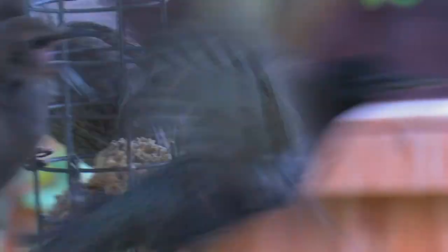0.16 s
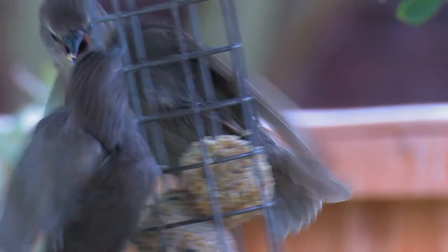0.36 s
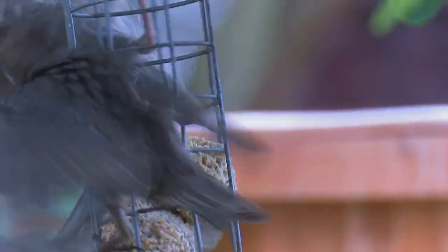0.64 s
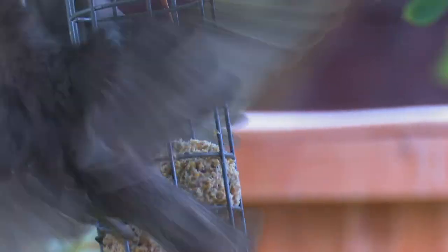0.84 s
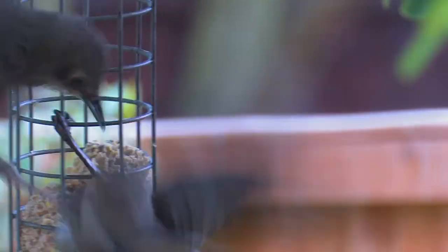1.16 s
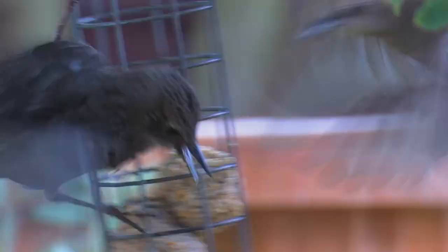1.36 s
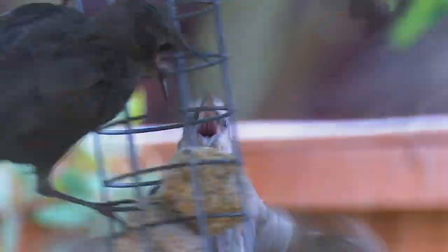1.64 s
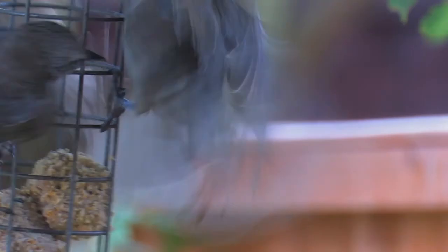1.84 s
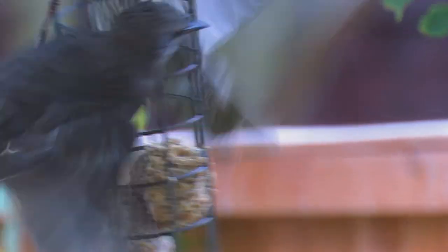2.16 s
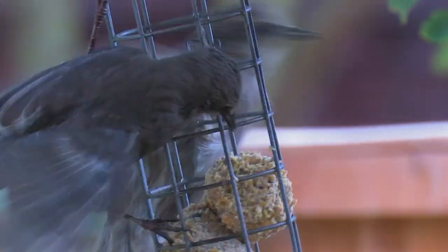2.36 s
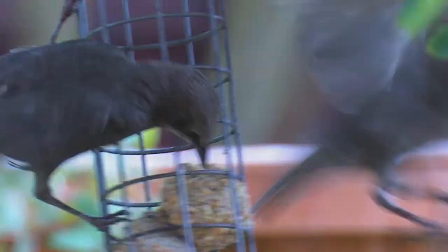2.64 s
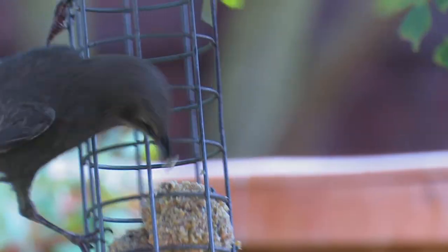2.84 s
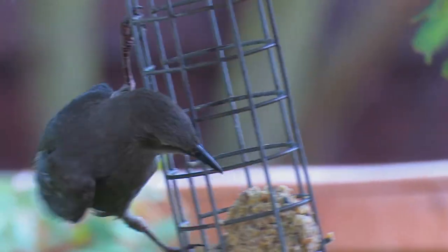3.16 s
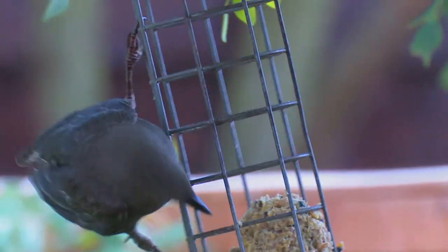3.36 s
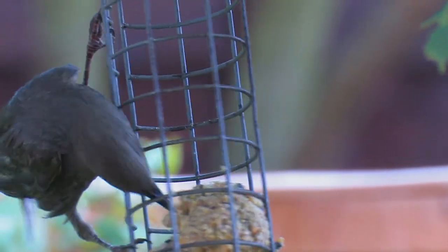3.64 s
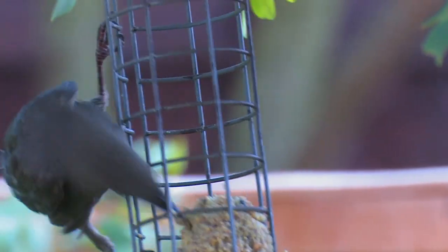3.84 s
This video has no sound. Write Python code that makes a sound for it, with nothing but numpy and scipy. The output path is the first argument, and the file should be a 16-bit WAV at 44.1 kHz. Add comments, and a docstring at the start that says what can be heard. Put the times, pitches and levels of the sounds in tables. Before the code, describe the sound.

Young starlings squabble close to the microphone with rasping squawks, sharp squeals and buzzing trills over fluttering wings, then quieten after about 2.7 seconds, leaving beak taps and distant pigeon coos in an open garden.

```python
"""Young starlings squabble at a wire garden feeder: harsh squawks (harmonics and pulsing noise through a throat filter,
with a swerving screech), gliding squeals and buzzing trills (shaking whistled tones) overlap.
Beaks tap the cage (decaying noise) and wings flap (noise swelling at each beat). Further off a wood pigeon coos
five times in two-tone coos, and other birds whistle and rasp. Fences and walls answer faintly with reflections and
a diffuse echo, over a low outdoor rumble of noise, a faint hum and a low drone."""
import sys
import numpy as np
from scipy import signal
from scipy.fft import rfft, irfft, next_fast_len
from scipy.io import wavfile
from scipy.ndimage import map_coordinates

SR = 44100
rng = np.random.default_rng(int(sys.argv[2]) if len(sys.argv) > 2 else 0)


def materialize(psi):
    """Save the field psi as 16-bit PCM at rate SR to the path in sys.argv[1].

    A 1-D psi becomes a single channel; in a 2-D psi each row is a channel.
    """
    bounded = np.clip(np.atleast_2d(psi).T, -1, 1)
    quanta = np.round(bounded * 32767).astype(np.int16)
    wavfile.write(sys.argv[1], SR, quanta)


N = 176400
T = np.arange(N) / SR

# throat resonances of the near birds: (frequency [Hz], level [dB])
THROAT = [(530, -45), (900, -15), (1380, -25.5), (1630, -12.5), (2420, -8), (2660, -5.5), (4280, -10.5),
          (5180, -5), (5910, -9), (10300, -20), (12100, -28.5), (15500, -27)]
JITTER_PER_S, WANDER_PER_S = 900, 130  # fast and slower unsteadiness, random knots per second
SECOND_DB = -15.5  # second harmonic of squeals and screeches


def amp(db):
    """Decibels to gain."""
    return 10 ** (np.asarray(db) / 20)


def unit(x):
    """Scale to rms 1."""
    return x / np.sqrt(np.mean(x ** 2) + 1e-20)


def along(points, hz):
    """Read a curve of (frequency, value) points on a log frequency axis."""
    f, v = np.transpose(points)
    return np.interp(np.log(hz + 1), np.log(f + 1), v)


def wobble(rate, n):
    """A smooth random curve with rate knots a second."""
    knots = rng.standard_normal(n // 8 + 4)
    return map_coordinates(knots, [np.arange(n) * rate / SR], mode="mirror")


def filtered(x, response):
    """Shape the spectrum of x by a response of frequency."""
    m = next_fast_len(len(x) + SR // 20)
    hz = np.fft.rfftfreq(m, 1 / SR)
    return irfft(rfft(x, m) * response(hz), m)[:len(x)]


def noise(spectrum, n):
    """Coloured noise of rms 1."""
    return unit(filtered(rng.standard_normal(n), lambda f: amp(along(spectrum, f))))


def add(track, s, x):
    """Mix x into the track at s seconds."""
    i = max(0, round(s * SR))
    track[i:i + len(x)] += x[:max(0, N - i)]


def clock(length):
    """Seconds and fraction elapsed within a call of at least 4 ms."""
    t = np.arange(int(max(length, .004) * SR)) / SR
    return t, t / t[-1]


def gate(t, attack, release):
    """Attack, hold, release, with quarter-sine edges."""
    rise = np.sin(np.pi / 2 * np.clip(t / attack, 0, 1))
    return rise * np.sin(np.pi / 2 * np.clip((t[-1] - t) / release, 0, 1))


def arch(u, first, middle, last):
    """A parabola through three pitches."""
    return np.polyval(np.polyfit([0, .5, 1], [first, middle, last], 2), u)


def phase_of(hz):
    """Running phase of a pitch curve."""
    return 2 * np.pi * np.cumsum(hz) / SR


def squawks():
    """Unsteady harmonics of falling pitch and pulsing noise ring in throat and open beak, under a screech."""
    # harsh calls: (time [s], length [s], pitch [Hz], level [dB], beak resonance [Hz])
    squawk_calls = [(0.038, 0.07, 1159, -34, 3530), (0.152, 0.095, 1032, -31.5, 3980),
                    (0.292, 0.05, 953, -29.5, 4500), (0.374, 0.075, 1248, -28, 4480),
                    (0.44, 0.072, 1154, -29, 4090), (0.504, 0.094, 1096, -38.5, 5020),
                    (0.579, 0.067, 1010, -33.5, 4980), (0.716, 0.094, 1410, -38, 8000),
                    (0.805, 0.053, 1055, -34.5, 5930), (0.858, 0.077, 1106, -39, 4620),
                    (0.916, 0.18, 1404, -35.5, 4535), (1.134, 0.016, 1202, -38.5, 4180),
                    (1.327, 0.032, 1059, -39, 4370), (1.435, 0.048, 946, -42, 3570),
                    (1.594, 0.072, 1295, -35, 4590), (1.651, .11, 1311, -33.5, 4970),
                    (1.744, 0.13, 1344, -36.5, 5020), (1.862, 0.079, 1414, -37.5, 4310),
                    (1.977, 0.057, 1054, -35, 4990), (2.049, 0.066, 1402, -38.5, 4740),
                    (2.154, 0.057, 1008, -36, 4870), (2.35, 0.034, 1060, -38, 3220),
                    (2.385, 0.038, 866, -41.5, 4180), (2.46, 0.059, 845, -34.5, 5000),
                    (2.635, 0.094, 1432, -46.5, 5390), (3.845, .1, 857, -44.5, 3500),
                    (3.946, 0.067, 893, -44.5, 2950)]
    pitch_fall, jitter, wander = .2, .033, .045  # fractions of the pitch
    noise_share, flutter_db = .17, 2.5  # share of power; roughness of level
    beak_db, beak_octaves = 5.5, 0.55  # height and width of the beak resonance
    screech_db = -2
    out = np.zeros(N)
    for s, length, pitch_hz, db, beak_hz in squawk_calls:
        t, u = clock(length)
        n = len(t)
        fall = 1 - pitch_fall * u ** 2
        shake = 1 + jitter * wobble(JITTER_PER_S, n) + wander * wobble(WANDER_PER_S, n)
        p = phase_of(pitch_hz * fall * shake)
        start_phases = rng.uniform(0, 2 * np.pi, (14, 1))
        harmonics = unit(np.cos(np.arange(1, 15)[:, None] * p + start_phases).sum(0))
        hiss = unit(rng.standard_normal(n) * (1 + np.cos(p)))  # swells once per pitch cycle
        source = np.sqrt(1 - noise_share) * harmonics + np.sqrt(noise_share) * hiss
        source = source * amp(flutter_db * wobble(310.6, n))

        def tract(f):
            """Throat and open-beak resonances, thinned below about 700 Hz."""
            octaves_off = np.log2((f + 1) / beak_hz)
            beak = beak_db * np.exp(-.5 * (octaves_off / beak_octaves) ** 2)
            return amp(along(THROAT, f) + beak) * (1 - np.exp(-(f / 700) ** 2))

        voice = unit(filtered(source, tract)) + amp(screech_db) * screech(beak_hz * fall, n)
        add(out, s, amp(db) * unit(voice * gate(t, 0.0077, 0.016)))
    return out


def screech(hz, n):
    """The other side of the syrinx: one tone that swerves wildly about its pitch."""
    swing, rate, flutter_db = .17, 250, 3.5  # log pitch ratio, knots per second, level scatter
    p = phase_of(hz * np.exp(swing * wobble(rate, n)))
    tone = np.sin(p) + amp(SECOND_DB) * np.sin(2 * p)
    return unit(tone * amp(flutter_db * wobble(rate, n)))


def squeals():
    """Each squeal is a syrinx tone gliding along an arch of pitch."""
    # (time [s], length [s], start [Hz], middle [Hz], end [Hz], level [dB], roughness [0-1])
    squeal_calls = [(0, 0.043, 4030, 3930, 3510, -39, 0.25), (0.154, 0.061, 2956, 2900, 2980, -40, 0.06),
                    (.228, 0.062, 3187, 3240, 2654, -34, 0.39), (0.486, 0.08, 3100, 3400, 2786, -35, 0.15),
                    (0.469, 0.1, 6370, 6780, 5770, -36.5, 0.21), (0.62, 0.07, 7620, 6640, 6300, -36.5, 0.1),
                    (0.726, 0.054, 5600, 5740, 6050, -30.5, 0.27), (0.865, .032, 5000, 4600, 4170, -36, .5),
                    (1.058, 0.088, 5000, 5030, 4910, -40.5, 0.14),
                    (1.238, 0.052, 6100, 6530, 6460, -42.5, 0.14),
                    (1.288, 0.026, 6360, 6250, 6180, -38, 0.01), (1.336, .085, 3250, 3200, 3080, -45, .15),
                    (1.424, 0.012, 3380, 3180, 2720, -38, 0.44),
                    (1.561, 0.038, 4410, 3974, 3380, -32, 0.32), (1.653, 0.06, 4690, 5600, 4510, -30, 0.32),
                    (1.746, .034, 4700, 4725, 5470, -27.5, 0.39),
                    (1.77, 0.042, 6010, 6760, 6180, -32, 0.22),
                    (1.812, 0.038, 5310, 4814, 3750, -29.5, 0.44),
                    (1.942, 0.079, 5600, 5520, 6100, -41, 0.17),
                    (2.055, 0.043, 4570, 4200, 4930, -30.5, .35),
                    (2.098, 0.046, 4960, 5730, 5440, -32.5, 0.12),
                    (2.186, 0.049, 4905, 5500, 3110, -37.5, 0.35),
                    (2.638, 0.017, 3590, 5400, 6730, -34, 0.37),
                    (2.661, 0.048, 6700, 6570, 6020, -37, 0.15),
                    (2.699, 0.013, 5860, 3596, 2670, -44, 0.65), (3.261, 0.054, 6400, 6290, 7200, -55, 0.2),
                    (3.945, 0.013, 4650, 4360, 3730, -39.5, 0)]
    edge_s = 0.0044
    out = np.zeros(N)
    for s, length, first, middle, last, db, rough in squeal_calls:
        t, u = clock(length)
        tone = syrinx(arch(u, first, middle, last), rough, SECOND_DB)
        add(out, s, amp(db) * unit(gate(t, edge_s, edge_s) * tone))
    return out


def syrinx(hz, rough, second_db):
    """A whistled tone whose pitch and strength shake; the rougher it is, the more rasp goes with it."""
    jitter, wander, flutter_db, rasp_db = 0.185, 0.0846, 1.5, -8  # all at full roughness
    stutter_db, muffle_hz = 2.5, 12000  # level scatter at any roughness; treble limit
    n = len(hz)
    shake = jitter * wobble(JITTER_PER_S, n) + wander * wobble(WANDER_PER_S, n)
    p = phase_of(hz * (1 + rough * shake))
    rasp = amp(rasp_db) * rough * noise(THROAT, n)
    tone = np.sin(p) + amp(second_db) * np.sin(2 * p) + rasp
    tone = tone * amp(flutter_db * rough * wobble(523, n) + stutter_db * wobble(WANDER_PER_S, n))
    return unit(filtered(tone, lambda f: 1 / (1 + (f / muffle_hz) ** 4)))


def trills():
    """Rapid upward flicks of pitch make the buzz, louder at each flick; the call swells and fades."""
    # (time [s], length [s], low pitch [Hz], sweep [Hz], rate [sweeps/s], level [dB])
    trill_calls = [(0.052, 0.094, 3190, 995, 59, -37.5), (0.119, 0.075, 3025, 1294, 44, -31),
                   (0.445, 0.043, 3210, 1194, 60, -29), (.914, .15, 2957, 1497, 64, -27),
                   (1.499, 0.073, 4230, 1290, 78, -33.5), (1.997, 0.073, 4290, 907, 105, -28)]
    rough, pulse_db, second_db = .2, 10, -20
    out = np.zeros(N)
    for s, length, low_hz, sweep_hz, rate, db in trill_calls:
        t, u = clock(length)
        cycle = phase_of(rate * (1 + 0.0374 * wobble(55.0, len(t)))) - np.pi / 2
        flick = np.exp(2 * (np.cos(cycle) - 1))  # peaks at 1 once a cycle
        tone = syrinx(low_hz + sweep_hz * flick, rough, second_db) * amp(pulse_db * flick)
        add(out, s, amp(db) * unit(tone) * gate(t, length * 0.3, length * .5))
    return out


def taps():
    """Beak on the cage: short dry clicks of coloured noise that decay exponentially."""
    # (time [s], level [dB])
    tap_times = [(2.45, -38), (2.807, -34), (3.003, -39.5), (3.636, -30)]
    # ring of the cage: (frequency [Hz], level [dB])
    tap_colour = [(590, -44), (1000, -9), (3740, -5.5), (6560, -14.5), (7610, -20), (8740, -14.5),
                  (11600, -23), (15500, -50)]
    t60_s, trim_db = 0.011, -2.5
    out = np.zeros(N)
    t, u = clock(0.058)
    for s, db in tap_times:
        add(out, s, amp(db + trim_db - 60 * t / t60_s) * noise(tap_colour, len(t)))
    return out


def wings():
    """A puff of air with every uneven wingbeat."""
    # loudness of the flapping: (time [s], level [dB])
    flap_level = [(0, -41), (.5, -42.5), (1.1, -50.5), (1.4, -45.5), (1.8, -48.5), (2.55, -50.5),
                  (2.8, -65), (2.9, -83.5)]
    # spectrum of the moved air: (frequency [Hz], level [dB])
    wing_colour = [(20, -18), (60, 5.5), (130, -19), (400, -29), (1200, -23.5), (5000, -19.5), (15000, -41)]
    beats_per_s = 13
    beat = amp(5.5 * np.sin(phase_of(beats_per_s * (1 + 0.19 * wobble(6.056, N)))))
    level = amp(np.interp(T, *np.transpose(flap_level)))
    return level * unit(beat * noise(wing_colour, N))


def pigeon():
    """Soft coos: a low tone and a second one above it, both unsteady in pitch and so husky."""
    # (time [s], length [s], start [Hz], middle [Hz], end [Hz], level [dB])
    coo_calls = [(2.049, 0.35, 332, 375, 384, -48.5), (2.28, .38, 373.6, 422, 405.6, -46),
                 (2.761, 0.33, 391, 368.2, 288, -46.5), (3.331, .26, 360.7, 368, 329, -48.5),
                 (3.59, 0.3, 372, 359, 328, -47)]
    upper_ratio, upper_db = 1.38, -6  # second tone over the first
    out = np.zeros(N)
    for s, length, first, middle, last, db in coo_calls:
        t, u = clock(length)
        hz, n = arch(u, first, middle, last), len(t)
        low = np.sin(phase_of(hz * (1 + 0.0445 * wobble(89.4, n))))
        high = np.sin(phase_of(upper_ratio * hz * (1 + 0.0815 * wobble(121.2, n))))
        add(out, s, amp(db) * unit(low + amp(upper_db) * high) * gate(t, 0.078, .14))
    return out


def far_birds():
    """Thin whistles from nearly smooth syrinx tones, and one rasp of fluttering noise, down the garden."""
    # (time [s], length [s], start [Hz], middle [Hz], end [Hz], level [dB])
    whistle_calls = [(3.544, 0.083, 2310, 2416, 2390, -62), (3.65, 0.1, 2790, 2875, 2900, -63),
                     (3.753, .08, 2940, 3004, 2980, -63), (3.72, .12, 1410, 1480, 1490, -63)]
    # one rasp: (time [s], length [s], level [dB])
    rasp_call = (3.4, 0.164, -51.5)
    # spectrum of the rasp: (frequency [Hz], level [dB])
    rasp_colour = [(900, -23), (1400, -2), (1900, 0), (2600, -6.5), (3400, -21), (6000, -40.5)]
    edge_s = 0.013
    out = np.zeros(N)
    for s, length, first, middle, last, db in whistle_calls:
        t, u = clock(length)
        tone = syrinx(arch(u, first, middle, last), 0.039, -33)
        add(out, s, amp(db) * tone * gate(t, edge_s, edge_s))
    s, length, db = rasp_call
    t, u = clock(length)
    flutter = amp(2.9 * wobble(143, len(t)))
    rasp = unit(noise(rasp_colour, len(t)) * flutter)
    add(out, s, amp(db) * rasp * gate(t, 0.088, 0.023))
    return out


def walls(x, count=16):
    """Early reflections from the fence and ground: copies 2 to 30 ms late, of either polarity."""
    echo = np.zeros(SR // 10)
    delays = (rng.uniform(.002, .03, count) * SR).astype(int)
    echo[delays] = rng.choice([-1, 1], count) / np.sqrt(count)
    return signal.fftconvolve(x, echo)[:N]


def garden(x):
    """A diffuse echo: a noise tail whose decay time depends on frequency."""
    # (frequency [Hz], time to fall 60 dB [s])
    decay_times = [(300, 0.32), (6000, 0.46), (14000, 0.36)]
    hz, t, z = signal.stft(rng.standard_normal(SR), SR, nperseg=256)
    decay = amp(-60 * t / along(decay_times, hz)[:, None])
    tail = signal.istft(z * decay, SR, nperseg=256)[1]
    return signal.fftconvolve(x, tail / np.linalg.norm(tail))[:N]


def background():
    """Outdoor rumble of noise, a faint hum of wavering tones and a low drone that dies away."""
    # low drone: (time [s], level [dB], pitch [Hz])
    drone_path = [(0, -56, 84.4), (.03, -41.5, 83.3), (.31, -40.5, 83.7), (.53, -43, 86.4),
                  (.59, -56.5, 85.3), (.79, -46.5, 88.6), (1, -67.5, 90.5)]
    # hum tones: (frequency [Hz], level [dB])
    hum_tones = [(99, -57.5), (149.6, -58.5), (200, -65.5)]
    # outdoor air spectrum: (frequency [Hz], relative level [dB])
    air_colour = [(20, -1.5), (55, 4), (120, -8.5), (300, -9.5), (700, -16), (1600, -21.5), (2400, -29),
                  (4000, -38), (7000, -42), (15500, -42)]
    air_db = -48
    s, db, hz = np.transpose(drone_path)
    drone_level = amp(np.interp(T, s, db) + wobble(23.2, N))
    drone = drone_level * unit(np.sin(phase_of(np.interp(T, s, hz))))
    hum = np.zeros(N)
    for f, level in hum_tones:
        hum += amp(level + wobble(5.4, N)) * unit(np.sin(2 * np.pi * f * T))
    return drone + hum + amp(air_db) * noise(air_colour, N)


def scene():
    """Near birds with light echoes, far birds with more, over wings and background."""
    walls_db, near_echo_db, far_echo_db = -11, -9.5, -1.5
    near = squawks() + squeals() + trills() + taps()
    far = pigeon() + far_birds()
    echoes = amp(walls_db) * walls(near)
    echoes = echoes + garden(amp(near_echo_db) * near + amp(far_echo_db) * far)
    return (amp(-1.5) * near + amp(-0.5) * far + echoes + wings() + background())[None]


def record(dry):
    """Nothing is kept above the band limit."""
    top_hz = 15850
    return np.array([filtered(x, lambda hz: hz < top_hz) for x in dry])


dry = scene()
out = record(dry)
materialize(out)
```